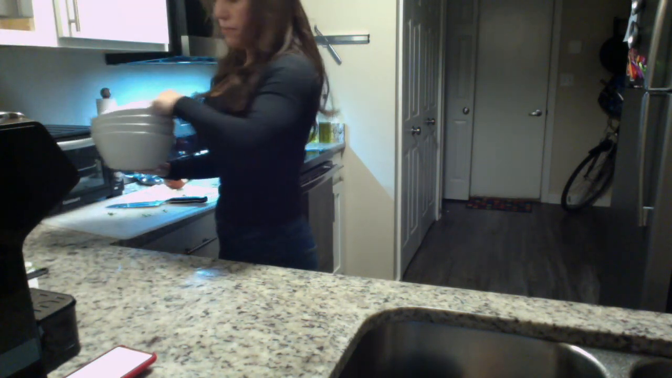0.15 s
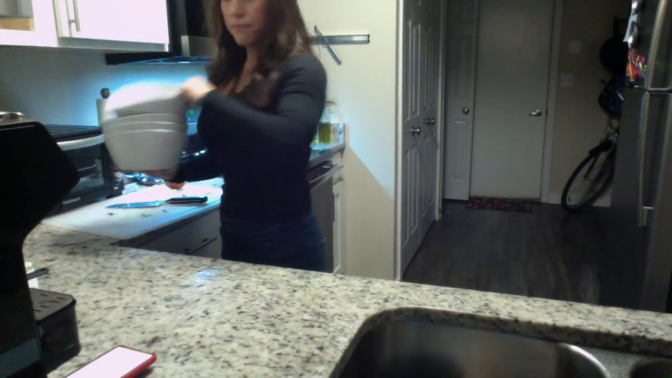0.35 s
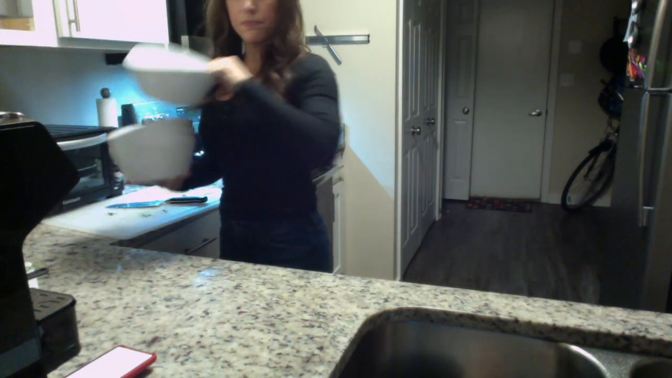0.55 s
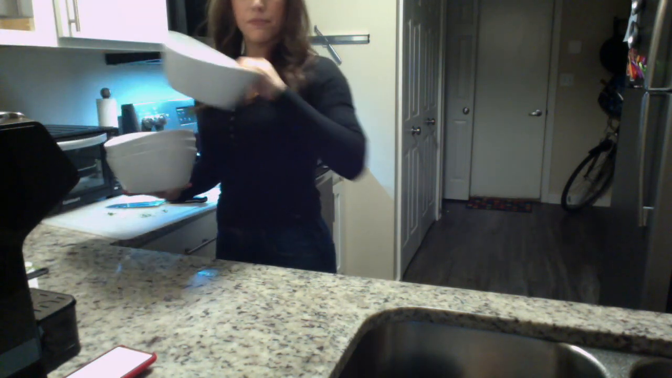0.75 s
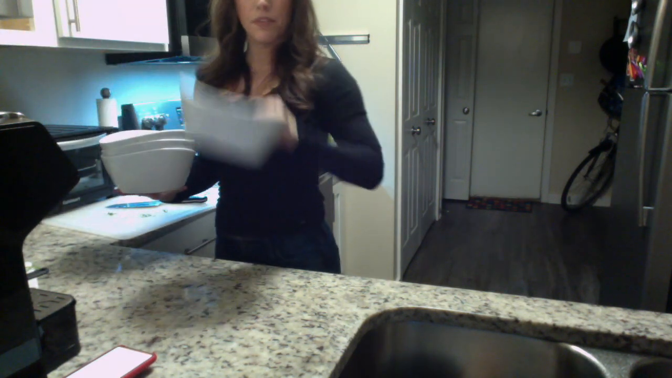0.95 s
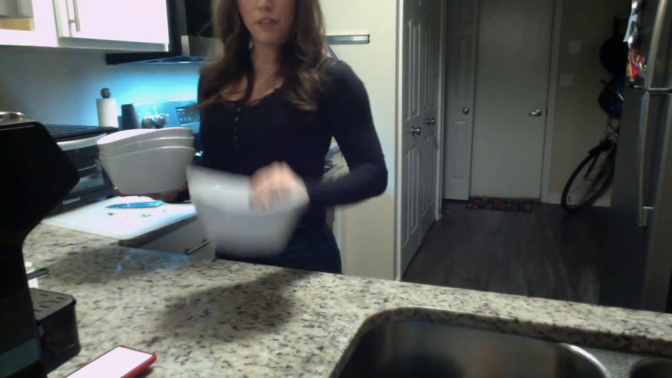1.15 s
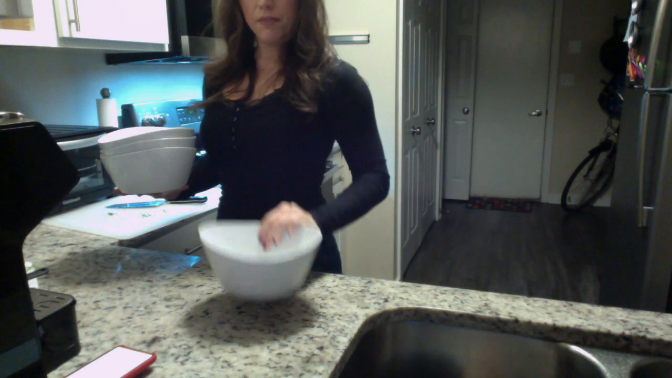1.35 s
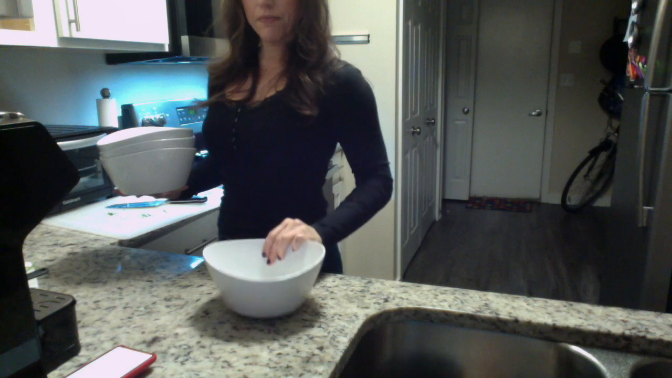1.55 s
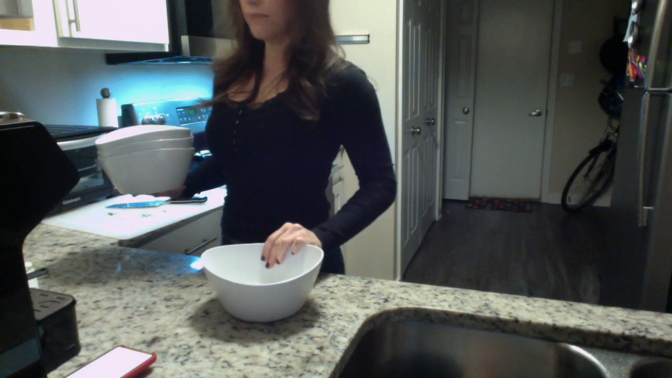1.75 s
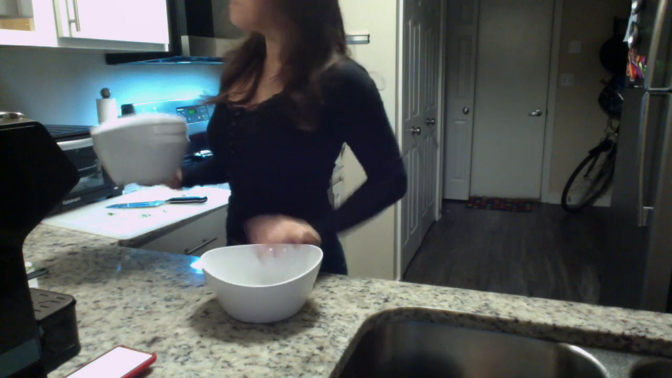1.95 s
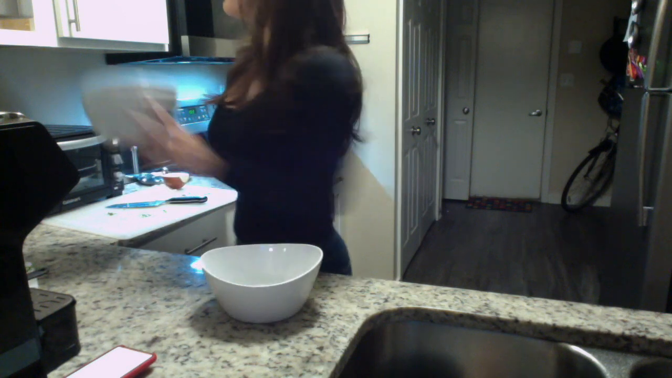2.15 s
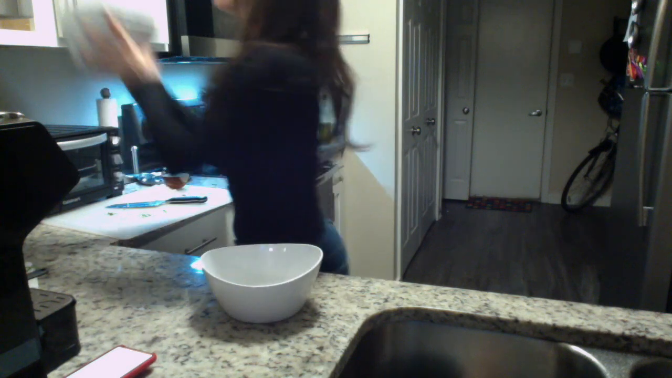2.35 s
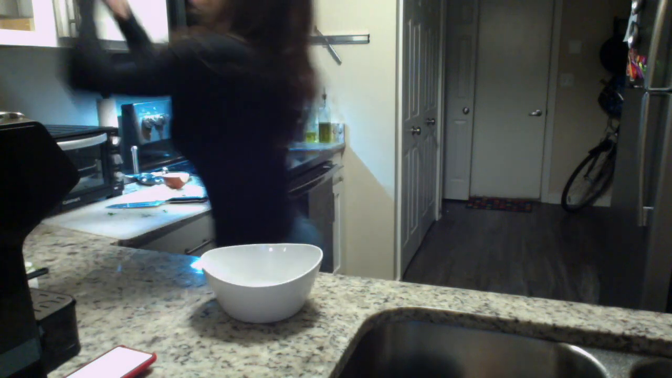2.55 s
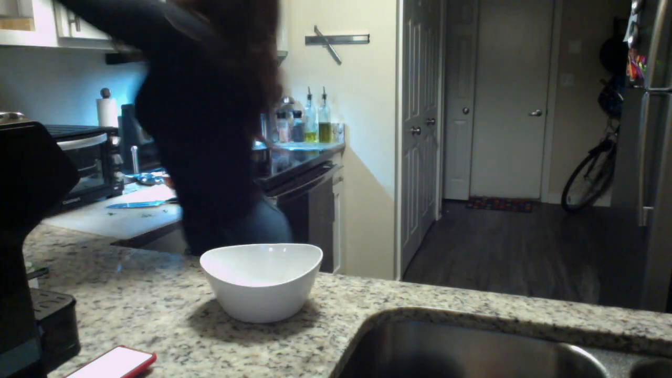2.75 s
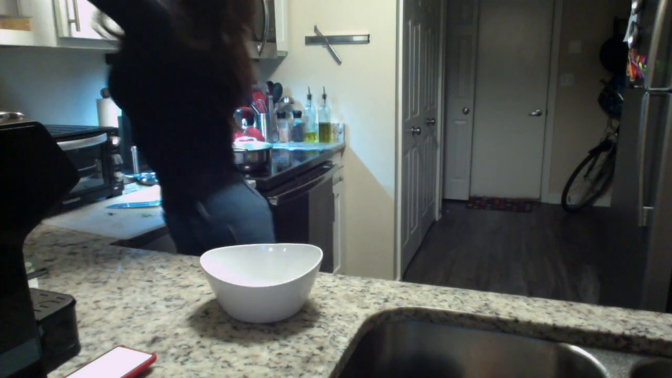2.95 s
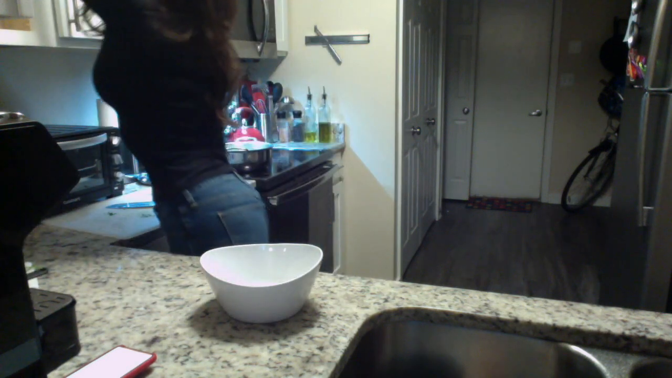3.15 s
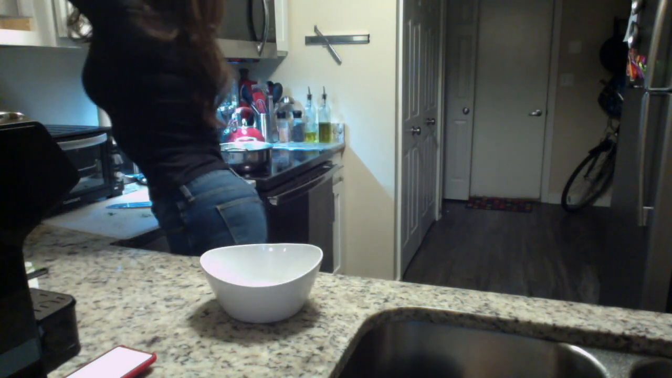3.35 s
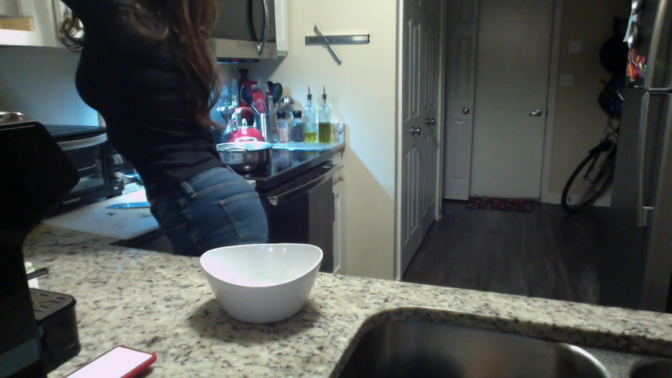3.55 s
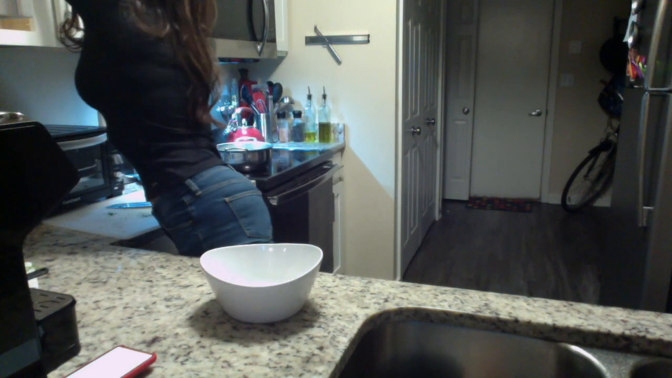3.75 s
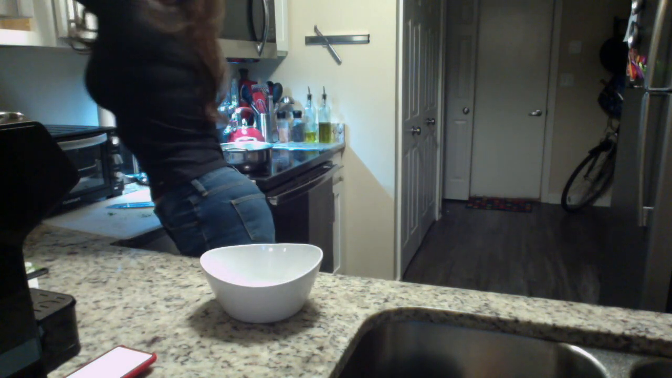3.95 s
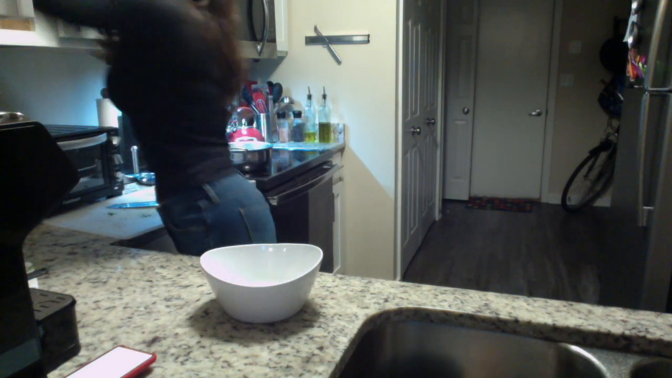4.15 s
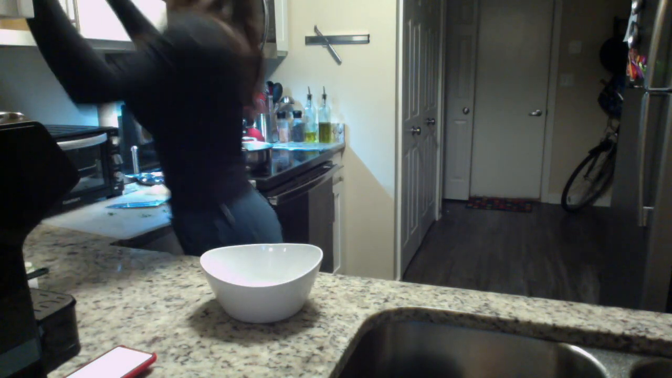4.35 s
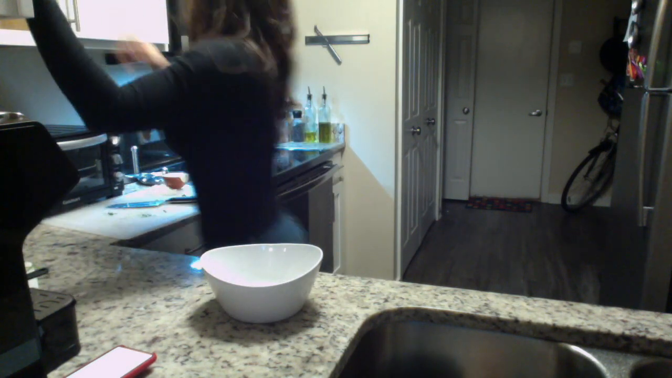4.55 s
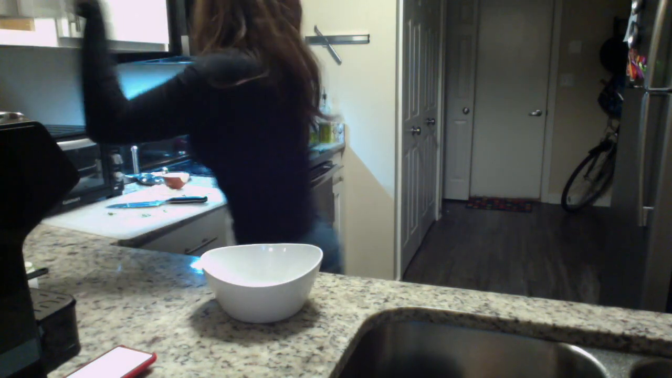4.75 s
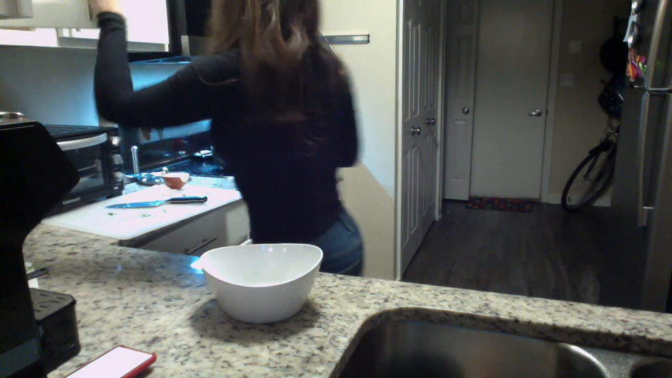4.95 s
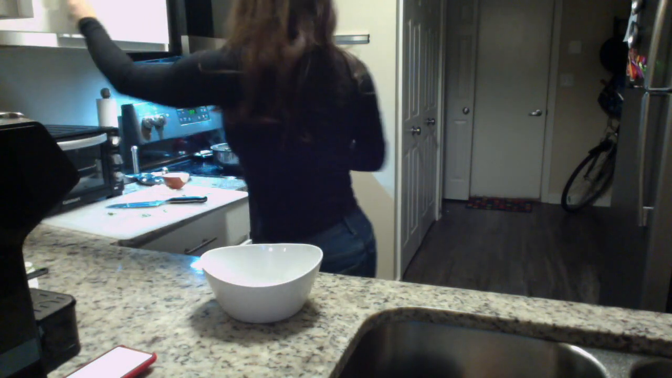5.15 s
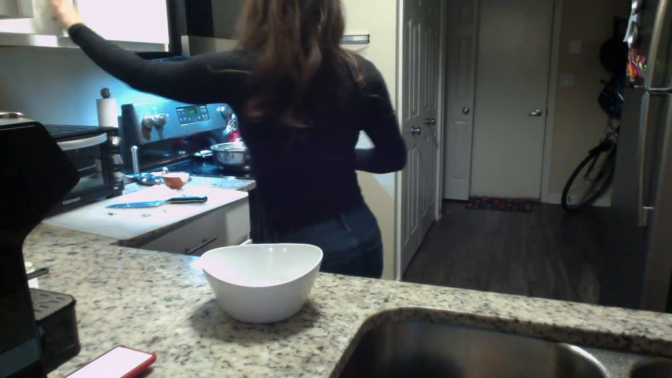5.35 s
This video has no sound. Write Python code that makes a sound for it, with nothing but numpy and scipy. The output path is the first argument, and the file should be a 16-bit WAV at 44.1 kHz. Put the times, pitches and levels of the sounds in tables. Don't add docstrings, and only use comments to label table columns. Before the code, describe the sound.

Close ceramic rattle and a hard, ringing bowl landing on stone, then light chinks, a wooden shelf thud, a slide and softly closing cupboard doors.

```python
import sys
import numpy as np
from scipy import signal
from scipy.fft import rfft, irfft
from scipy.io import wavfile
from scipy.ndimage import uniform_filter1d

SR = 44100
rng = np.random.default_rng(int(sys.argv[2]) if len(sys.argv) > 2 else 0)


def convert_level_to_amplitude(level_db):
    exponent = np.asarray(level_db, float) / 20
    return 10 ** exponent


def wav_record(signal):
    frames = np.transpose(np.atleast_2d(signal))
    bounded = np.clip(frames, -1, 1)
    quanta = np.round(bounded * 32767).astype(np.int16)
    wavfile.write(sys.argv[1], SR, quanta)


N = 242435
SPAN = 32768

# (frequency [Hz], t60 [s])
KITCHEN_T60 = [(100, 0.63), (260, 0.56), (700, 0.44), (1840, 0.39), (4850, 0.43), (6900, 0.33), (8600, .27),
               (12800, 0.15)]

# (frequency [Hz], level [dB per Hz])
HUM_COLOUR = [(15, -66), (25, -38), (43, -23), (62, -12), (92, -18), (129, 1.5), (162, -6.5), (179, -3),
              (322, 0.5), (500, -15), (650, -49.5), (1100, -120)]
HISS_COLOUR = [(240, -26.5), (400, 0.5), (504, -27), (545, 3.5), (1060, 1), (2550, -4.5), (2750, -5.5),
               (5350, -12.5), (16000, -36)]
# (time [s], opens
# to [dB], settles at [dB])
GAIN_LIFTS = [
    (0, 18.5, -2),
    (1.6, 20.5, 5.5),
    (3.2, 12.5, 6),
    (5.4, 13, 6),
]
SETTLE_S, HUM_DB, HISS_DB, HUM_FOLLOWS = 0.79, -71, -76.5, 0.6

# (time [s], peak [dB])
CATCH_CLICKS = [
    (4.263, -41),
    (4.271, -36),
]
# (time [s], peak [dB], contact [ms], ring [dB])
CLASP_TICKS = [
    (2.4735, -27, 5.5, -28),
    (4.507, -57, 4.4, -3),
    (4.715, -68, 5, -4),
    (5.432, -49.5, 2.9, 19.5),
]
LATCH_SNAPS = [
    (4.8449, -58, 2.1, -13),
    (4.868, -50.5, 5.8, 0.5),
    (5.236, -40, 6.3, -24),
    (5.4137, -51, 11.6, 3),
]
# (time [s], peak [dB], contact [ms], ring [dB])
DOORS_SHUT = [
    (5.441, -24, 25.6, -19),
    (5.471, -25.5, 41, -14.5),
]
# (time [s], peak [dB])
THUMPS = [
    (3.238, -36.5),
    (3.56, -47),
    (3.66, -52),
    (4.3, -40.5),
    (4.335, -55),
    (4.356, -75),
    (4.904, -47.5),
    (4.948, -52),
    (4.99, -50.5),
]
AFTER_THUMPS = [
    (3.19, -35),
    (4.325, -45),
    (4.38, -52),
    (5.0, -56),
]
# (frequency [Hz], level [dB], t60 [s])
HINGE_MODES = [(855, -5, 0.026), (1086, 4.5, 0.019), (1960, 3, 0.021), (3560, -6, 0.019), (4990, -7, 0.017),
               (5620, -9.5, 0.016), (7310, -11.5, 0.017)]
CLASP_MODES = [(4820, -5.5, 0.032), (5380, 7, 0.0081), (5800, -7, 0.026), (6600, -9, 0.02)]
LATCH_MODES = [(2810, 0, 0.021), (3460, -8, .012)]
DOOR_MODES = [(109.8, 10, 0.11), (161, -16, 0.041), (302, 1, 0.066), (403, 21.5, 0.045)]
# (frequency [Hz], level [dB per Hz])
TICK_COLOUR = [(710, -67), (1200, -12), (2000, -16), (3080, 5.5), (3740, 7), (5710, 5), (11800, -9.5),
               (13500, -26), (16000, -100)]
SNAP_COLOUR = [(530, -42.5), (900, -9), (950, -24.5), (1560, -14.5), (1880, -1), (4380, -9.5), (4720, -7.5),
               (12000, -54), (15600, -93), (22000, -120)]
WOOD_COLOUR = [(18, -57), (30, -41), (280, -3.5), (526, -12), (780, -4.5), (962, -8), (1040, -5),
               (1630, -5.5), (1860, -6.5), (6720, -30.5), (13300, -54.5), (16000, -57)]
DOOR_COLOUR = [(15, -61), (25, -32), (149, 2.5), (219, -8), (397, -9), (584, -16.5), (817, -11.5),
               (2020, -17.5), (2480, -23.5), (12000, -50), (15600, -62), (22000, -120)]
SOFT_COLOUR = [(15, -49), (25, -24.5), (126, 2.5), (418, -5), (499, -13), (595, -3), (830, -3), (1410, -4),
               (5000, -64), (6500, -70), (11000, -120)]

# (time [s], peak [dB], contact [ms], tilt [dB per octave], ring [dB])
SHELF_BLOWS = [
    (3.127, -18, 5.3, -5, -8),
    (3.1315, -9, 13.2, 1.6, -2.5),
    (3.359, -17.5, 9.4, 2.3, 2.5),
    (4.296, -38.5, 16, -1, -21),
    (4.335, -51, 6.6, -5.5, -21),
    (4.358, -63, 8, -2, -4.5),
]
ROCKING = [
    (3.166, -24, 6, -1, 0),
    (3.194, -23, 6, 0, 0),
    (3.366, -23, 6, 2, -2),
    (3.596, -32, 6, 0, 0),
    (4.31, -45, 5, 0, 2),
    (4.362, -46, 5, 0, 2),
]
# (frequency [Hz], level [dB], t60 [s])
STRUCK_SHELF_MODES = [(258, -7, .2), (380, 5, .04), (791, 1, .15), (872, 1, .12), (1034, -8, .15),
                      (1400, 3, .12), (1666, -1, .12), (1857, 5, .12), (2320, -3, .15), (2896, -8, .12)]
LOADED_SHELF_MODES = [(293.2, 4, 0.1), (435.4, 9, 0.024), (780.2, 3, 0.2), (1026, -12.5, 0.076),
                      (1351, 7.5, 0.102), (1803, -10, 0.31), (1930, -18, 0.092), (2310, 3.5, 0.065),
                      (3073, -5, 0.067), (3430, -2, 0.065)]
# (time [s], level [dB], attack [s], hold [s], t60 [s])
SLIDE_PUSHES = [
    (3.23, -43, 0.01, 0.093, 0.27),
    (3.315, -32, 0.059, 0.014, 0.57),
    (3.394, -38.5, 0.17, 0.11, 0.39),
]
# (frequency [Hz], level [dB per Hz])
SLIDE_COLOUR = [(35, -74), (100, -14), (300, -9), (560, -15), (780, 0), (1000, -4), (1650, -6.5),
                (2050, -4.5), (2900, -13), (3450, -9.5), (4200, -20), (6800, -30.5), (8000, -39),
                (13000, -60)]
# (frequency [Hz], width [Hz], level [dB])
SLIDE_RINGS = [(940, 95, -1.5), (1237, 89, 2), (1974, 131, -5), (2190, 27, -12), (2620, 20, -5),
               (2770, 74, -24), (3400, 73, -10), (3980, 23, -35)]

# (time [s], peak [dB], contact [ms], tilt [dB per octave])
CHINKS = [
    (0.001, -42, 14, 0),
    (0.029, -41, 9.8, 0),
    (0.044, -38, 4.7, 0),
    (0.061, -44.5, 12, 0),
    (0.093, -44, 16, 0),
    (2.433, -46, 8.7, 3),
    (2.6795, -33, 4, 4),
    (2.7965, -39, 6, 2),
    (2.879, -42, 3.9, 4),
    (3.016, -53, 4.4, 0),
]
SETTLING = [
    (2.686, -36, 7, -3),
    (2.806, -35, 6, -3),
    (2.893, -46, 6, -3),
]
REBOUND_S, REBOUND_DB = 0.011, -6.5
# (time [s], peak [dB])
TAP = [
    (2.219, -32.5),
]
# (frequency [Hz], level [dB], t60 [s])
HELD_STACK_MODES = [(388.5, -4, 0.045), (634, -8, 0.045), (1370, 7, 0.05), (1450, -6, 0.12),
                    (2260, 3, 0.05), (2185, 4, 0.018), (2995, 7, 0.024), (3370, -5, 0.02),
                    (3700, -4, 0.025), (4610, -31, .04), (6100, -15, 0.02), (6200, -23, 0.03),
                    (9130, -34, 0.03)]
NEAR_BOWL_MODES = [(721, -5, .05), (1305, 3.5, 0.032), (2056, 5, 0.037), (2246, 10.5, 0.021),
                   (2860, -4.5, 0.048), (3660, -19, .04), (4680, -25, 0.046), (6300, -24.5, 0.12)]
# (frequency [Hz], level [dB per Hz])
CHINK_COLOUR = [(150, -38.5), (250, 2.5), (458, -11), (995, -11.5), (1350, -6), (2230, 2), (5100, -24),
                (6240, -28), (7500, -35.5), (14000, -70)]

# (time [s], peak [dB], contact [ms])
RATTLE = [
    (0.190, -37.5, 7.6),
    (0.2188, -23.5, 5),
    (0.2488, -24, 7),
    (0.266, -22, 7),
    (0.2824, -26, 4.9),
    (0.2937, -23, 7.1),
    (0.3135, -22, 7),
    (0.3274, -20.5, 4.8),
]
# (frequency [Hz], level [dB], t60 [s])
STACK_MODES = [(477, -14.5, 0.049), (750, -17.5, 0.0802), (1365, -12, 0.06), (1823, -9.5, 0.059),
               (2260, -8, 0.12), (2820, -5, 0.055), (3785, -.5, 0.043), (4500, -24, 0.04),
               (4840, -2.5, .045), (4770, -11.5, 0.069), (5800, -20, .06), (6330, -6, 0.05),
               (8070, -14, 0.027), (8340, -17, .04), (8820, -14.5, 0.07), (9400, -22, 0.054),
               (9100, -21.5, 0.031), (10200, -21, 0.05), (11700, -29, 0.042), (11900, -23, .05),
               (12900, -26, .05), (13680, -33.5, 0.0415), (14250, -32, 0.045), (15150, -36, 0.044)]
# (frequency [Hz], level [dB per Hz])
STACK_COLOUR = [(250, -42.5), (500, -8), (1000, -26), (1400, -11.5), (3200, -6), (4400, -19), (4900, -8.5),
                (6800, -28), (7250, -62), (7800, -33), (8500, -31), (12000, -39), (16000, -60.5)]
# (time [s], level [dB], attack [s], hold [s], t60 [s])
GRIND_PUSH = (.219, -43, .01, .12, .14)
# (frequency [Hz], width [Hz], level [dB])
GRIND_RINGS = [(1830, 100, -8), (2270, 50, -5), (2820, 60, -3), (3870, 50, -8), (4750, 70, -5),
               (5070, 40, -6), (5690, 60, -17), (8070, 80, -19), (8340, 60, -21), (9150, 200, -18),
               (10200, 120, -19), (11700, 120, -26), (12100, 100, -24), (12800, 120, -29),
               (14300, 200, -31)]
# (frequency [Hz], beat [Hz], time [s], level [dB], swell [s], t60 [s], partner share)
FREED_RIM_TONES = [
    (2270, 14, .30, -42, .03, .2, .5),
    (6330, 20, .313, -43, .006, .16, .3),
    (3410, 9, .39, -45, .033, .2, .1),
    (2270, 14, .385, -50, .02, .2, .2),
]
GAP_SHUT_HZ, GAP_OPEN_HZ, GAP_OPENS_S, GAP_OPENING_S = 569, 659, 0.266, 0.0066
GAP_S, GAP_DB, GAP_ATTACK_S, GAP_HOLD_S, GAP_T60_S = 0.22, -37, 0.09, 0.039, 0.22

# (time [s], peak [dB], contact [ms], tilt [dB per octave], ring [dB])
LANDING = [
    (1.5075, 0.83, 7.2, -1.5, -5),
]
BOUNCE = [
    (1.693, -0.969, 9.5, 2.2, -7),
]
# (frequency [Hz], level [dB], t60 [s])
BOWL_MODES = [(592, -18, .15), (764, -15, .12), (877, -14, .2), (1044, -14, .2), (1125, -12, .15),
              (1270, -5, .07), (1650, -10, .12), (2003, -10, .2), (2686, -20, .2), (3844, -22, .15),
              (7747, -34, .1), (8200, -34, .1), (8689, -31, .1), (9300, -31, .07), (10150, -27, .045)]
TIPPED_BOWL_MODES = [(770, -8, .13), (1340, -19, .09), (1600, -11, .1), (2218, -17, .12), (2579, -21, .12),
                     (3849, -25, .12), (5608, -16, .1), (7741, -32, .12), (8210, -27, .12), (8699, -23, .1),
                     (9087, -28, .1), (10170, -21, .1), (11920, -30, .1), (12700, -29, .07),
                     (14200, -32, .06)]
# (frequency [Hz], level [dB per Hz])
LANDING_COLOUR = [(18, -70), (40, -49.5), (120, -23), (300, -15.5), (600, -17), (1300, 2), (2200, -8.5),
                  (3500, -14), (4600, -27), (5900, -34), (6300, -58), (7400, -60), (7800, -40), (10200, -43),
                  (10900, -60), (16000, -75)]
STONE_COLOUR = [(18, -70), (40, -49.5), (120, -23), (300, -15.5), (600, -10), (1000, -5), (1500, 0),
                (2200, -8), (3500, -12), (5500, -24), (6900, -39), (7800, -31.5), (10200, -35),
                (10900, -43), (16000, -53)]
# (time [s], level [dB], swell [s], t60 [s], partner share)
RIM_TONES = [
    [(0.021, -51, 0.038, 0.075, 0.045)],
    [(.235, -31.5, 0.095, 0.11, .15)],
    [(1.507, -17.5, 0.013, .26, 0.37), (1.693, -17.5, .016, 0.36, .45)],
    [(1.507, -25, 0.018, .25, .1), (1.693, -26, 0.036, .36, .22)],
]
RIM_HZ = 480, 3420, 3221, 5564
RIM_BEAT_HZ, PARTNER_OUTLASTS_DB_PER_S = (11, 9.5, 11.8, 11.2), 50
GATE_S, GATE_DB, GATE_CLOSING_S = 2.005, -9, 0.0045


def on_log_axis(table, size):
    hz, value = np.transpose(table)
    return np.interp(np.log(np.fft.rfftfreq(size, 1 / SR) + 1), np.log(hz), value)


def colour(x, table, tilt_db=0.):
    size = len(x)
    octaves = np.log2((np.fft.rfftfreq(size, 1 / SR) + 50) / 1500)
    cepstrum = irfft(np.log(convert_level_to_amplitude(on_log_axis(table, size) + tilt_db * octaves)), size)
    cepstrum[1:size // 2] *= 2
    cepstrum[size // 2 + 1:] = 0
    return irfft(rfft(x) * np.exp(rfft(cepstrum)), size)


def unit(x):
    return x / np.sqrt(np.sum(x ** 2))


def wander(step):
    targets = np.repeat(rng.standard_normal(N // step + 1), step)[:N]
    return uniform_filter1d(targets, size=step)


def envelope(s, attack, hold, t60, bend):
    t = np.arange(N) / SR - s
    fall = convert_level_to_amplitude(-60 * np.clip(t - attack - hold, 0, None) / t60)
    return np.clip(t / attack, 0, 1) ** bend * fall


def resonate(x, hz, width_hz):
    b, a = signal.iirpeak(hz, hz / width_hz, SR)
    return signal.lfilter(b, a, signal.lfilter(b, a, x))


def every(rows, **settings):
    return [(*row, *settings.values()) for row in rows]


def tilted(rows, tilt_db):
    return [(s, db, ms, tilt_db, ring_db) for s, db, ms, ring_db in rows]


def room(wet_db, build_ms, stretch=1):
    t = np.arange(SPAN) / SR
    hz, t60 = np.transpose(KITCHEN_T60)
    noise = rfft(rng.standard_normal(SPAN))
    tail = 0
    for one, decay in zip(np.eye(len(hz)), t60):
        band = irfft(noise * on_log_axis(np.c_[hz, one], SPAN))
        tail = tail + band * convert_level_to_amplitude(-60 * t / (decay * stretch))
    response = convert_level_to_amplitude(wet_db) * unit(tail * (1 - np.exp(-t * 1000 / build_ms)))
    response[0] += 1
    return response


def hits(events, knock, modes, space, split, share, scatter_db=2.5):
    out, t = np.zeros(N + SPAN), np.arange(SPAN) / SR
    hz, db, t60 = np.transpose(modes)
    pair = 1 + share * np.exp(2j * np.pi * split * np.outer(hz, t))
    body = pair * np.exp(2j * np.pi * np.outer(hz, t)) * convert_level_to_amplitude(-60 * np.outer(1 / t60, t))
    for s, peak_db, contact_ms, tilt_db, ring_db in events:
        contact = max(contact_ms, 0.2) / 1000
        push = rfft(rng.standard_normal(SPAN) * t * np.exp(-2 * t / contact))
        even = irfft(push / uniform_filter1d(np.abs(push), size=60))
        even *= (t < 0.1) * np.minimum(5 * t / contact, 1)
        crack = colour(even, knock, tilt_db)
        chance = rng.standard_normal((2, len(hz)))
        gain_db = db + scatter_db * chance[0] + tilt_db * np.log2(hz / 1500)
        gain = convert_level_to_amplitude(gain_db) * np.exp(2j * chance[1])
        ring = np.imag(gain @ body) * (1 - np.exp(-2 * t / contact)) ** 2
        source = unit(crack) + convert_level_to_amplitude(ring_db) * unit(ring)
        sound = signal.fftconvolve(source, space)[:SPAN]
        start = int(s * SR)
        out[start:start + SPAN] += sound * convert_level_to_amplitude(peak_db) / np.max(np.abs(sound))
    return out[:N]


def tone(hz, beat_hz, s, db, swell, t60, share):
    t = np.arange(N) / SR - s - swell
    outlasting = convert_level_to_amplitude(PARTNER_OUTLASTS_DB_PER_S * np.clip(t, 0, 1))
    partner = share * outlasting * np.exp(-2j * np.pi * beat_hz * t)
    wave = np.imag((1 + partner) * np.exp(2j * np.pi * (hz * t + rng.random())))
    return np.sqrt(2) * convert_level_to_amplitude(db) * envelope(s, swell, 0, t60, bend=1.8) * wave


def background():
    t = np.arange(N) / SR
    lifts = np.array(GAIN_LIFTS)
    latest = np.clip(np.searchsorted(lifts[:, 0], t) - 1, 0, None)
    s, opens_db, rests_db = lifts[latest].T
    lift_db = rests_db + (opens_db - rests_db) * np.exp((s - t) / SETTLE_S)
    lift_db = uniform_filter1d(lift_db, size=4000)
    hum = colour(rng.standard_normal(N), HUM_COLOUR)
    hiss = colour(rng.standard_normal(N), HISS_COLOUR)
    hum_db = HUM_DB + HUM_FOLLOWS * lift_db + 0.5284 * wander(2000)
    return hum / np.std(hum) * convert_level_to_amplitude(hum_db) + hiss / np.std(hiss) * convert_level_to_amplitude(HISS_DB + lift_db)


def catch_and_latches(far, hands):
    catch = every(CATCH_CLICKS, contact_ms=10.6, tilt_db=0.8, ring_db=2.5)
    out = hits(tilted(CLASP_TICKS, 0.4), TICK_COLOUR, CLASP_MODES, far, split=0.06, share=0.69)
    out += hits(tilted(LATCH_SNAPS, 0.0), SNAP_COLOUR, LATCH_MODES, far, split=0.01, share=0.3)
    return out + hits(catch, WOOD_COLOUR, HINGE_MODES, hands, split=0.041, share=0.98)


def doors(cupboard):
    thumps = every(THUMPS, contact_ms=19.4, tilt_db=-4.1, ring_db=-4.0)
    after = every(AFTER_THUMPS, contact_ms=19.4, tilt_db=-2.5, ring_db=2.5)
    out = hits(thumps, SOFT_COLOUR, DOOR_MODES, cupboard, split=0.017, share=0.33)
    out += hits(after, SOFT_COLOUR, DOOR_MODES, cupboard, split=0.017, share=0.33)
    return out + hits(tilted(DOORS_SHUT, -0.6), DOOR_COLOUR, DOOR_MODES, cupboard, split=0.039, share=0.54)


def shelf(cupboard):
    out = hits(SHELF_BLOWS[:2], WOOD_COLOUR, STRUCK_SHELF_MODES, cupboard, split=0.008, share=0.4)
    out += hits(SHELF_BLOWS[2:], WOOD_COLOUR, LOADED_SHELF_MODES, cupboard, split=0.0032, share=0.37)
    return out + hits(ROCKING, WOOD_COLOUR, STRUCK_SHELF_MODES, cupboard, split=0.01, share=0.4)


def slide(space):
    push = sum(convert_level_to_amplitude(db) * envelope(s, attack, hold, t60, bend=1.4) for s, db, attack, hold, t60 in SLIDE_PUSHES)
    slips = rng.standard_normal(N) * convert_level_to_amplitude(0.54 * rng.exponential(size=N))
    judder = convert_level_to_amplitude(1.5 * wander(300))
    rings = sum(convert_level_to_amplitude(db) * resonate(slips, hz, 1.26 * width_hz) for hz, width_hz, db in SLIDE_RINGS)
    source = unit(colour(slips * judder, SLIDE_COLOUR)) + convert_level_to_amplitude(-7.5) * unit(rings * judder)
    scrape = signal.fftconvolve(source, space)[:N]
    return scrape / np.std(scrape) * push


def chinks(hands):
    rebounds = [(s + REBOUND_S, db + REBOUND_DB, ms, tilt_db) for s, db, ms, tilt_db in CHINKS]
    twice = every(CHINKS + rebounds, ring_db=6.5)
    tap = every(TAP, contact_ms=5.5, tilt_db=-0.5, ring_db=5)
    settling = every(SETTLING, ring_db=7.5)
    out = hits(twice, CHINK_COLOUR, HELD_STACK_MODES, hands, split=0.043, share=0.34)
    out += hits(tap, CHINK_COLOUR, NEAR_BOWL_MODES, hands, split=0.0083, share=0.39)
    return out + hits(settling, CHINK_COLOUR, HELD_STACK_MODES, hands, split=0.035, share=0.5)


def gap_air():
    opened = 0.5 + 0.5 * np.tanh((np.arange(N) / SR - GAP_OPENS_S) / GAP_OPENING_S)
    hz = GAP_SHUT_HZ + (GAP_OPEN_HZ - GAP_SHUT_HZ) * opened
    level = convert_level_to_amplitude(GAP_DB + 6.3 * wander(400))
    level = level * envelope(GAP_S, GAP_ATTACK_S, GAP_HOLD_S, GAP_T60_S, bend=1.1)
    return np.sqrt(2) * level * np.sin(2 * np.pi * np.cumsum(hz) / SR)


def grind():
    grit = rng.standard_normal(N) * convert_level_to_amplitude(2.5 * rng.exponential(size=N))
    rings = sum(convert_level_to_amplitude(db) * unit(resonate(grit, hz, 1.5 * width_hz)) for hz, width_hz, db in GRIND_RINGS)
    s, db, attack, hold, t60 = GRIND_PUSH
    return rings / np.std(rings) * convert_level_to_amplitude(db) * envelope(s, attack, hold, t60, bend=1.2)


def bowl_leaves_stack(held):
    rattle = every(RATTLE, tilt_db=0.07, ring_db=1.5)
    out = hits(rattle, STACK_COLOUR, STACK_MODES, held, split=0.007, share=0.6)
    return out + gap_air() + grind() + sum(tone(*row) for row in FREED_RIM_TONES)


def rim():
    pitches = zip(RIM_HZ, RIM_BEAT_HZ, RIM_TONES)
    return sum(tone(hz, beat_hz, *row) for hz, beat_hz, rows in pitches for row in rows)


def bowl_on_stone(counter):
    out = hits(LANDING, LANDING_COLOUR, BOWL_MODES, counter, split=0.006, share=0.5)
    out += hits(BOUNCE, STONE_COLOUR, TIPPED_BOWL_MODES, counter, split=0.004, share=0.5) + rim()
    closed = 0.5 + 0.5 * np.tanh((np.arange(N) / SR - GATE_S) / GATE_CLOSING_S)
    return out * convert_level_to_amplitude(GATE_DB * closed)


def scene():
    counter = room(wet_db=-5.0, build_ms=5.9, stretch=1.07)
    hands = room(wet_db=-10, build_ms=4.9)
    cupboard = room(wet_db=-3, build_ms=0.86)
    held = room(wet_db=-7.5, build_ms=2.5, stretch=0.85)
    far = room(wet_db=10.5, build_ms=1)
    mix = background()
    mix += catch_and_latches(far, hands)
    mix += doors(cupboard)
    mix += shelf(cupboard)
    mix += slide(hands)
    mix += chinks(hands)
    mix += bowl_leaves_stack(held)
    mix += bowl_on_stone(counter)
    return mix[None]


def top_cut(x):
    return signal.sosfilt(signal.butter(12, 16400, fs=SR, output="sos"), x)


def record(dry):
    top, knee = 0.52, 14
    held = dry / (1 + np.abs(dry / top) ** knee) ** (1 / knee)
    low_cut = signal.butter(1, 40, "high", fs=SR, output="sos")
    high_cut = signal.butter(10, 16000, fs=SR, output="sos")
    mix = signal.sosfilt(high_cut, signal.sosfilt(low_cut, held))
    return top_cut(mix)


dry = scene()
out = record(dry)
wav_record(out)
```